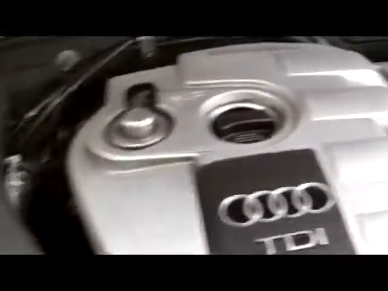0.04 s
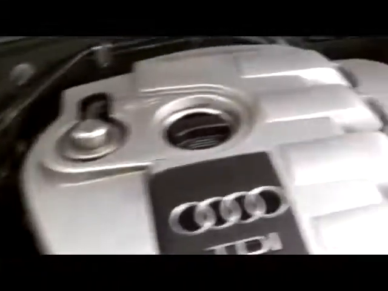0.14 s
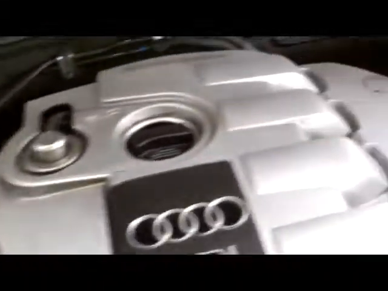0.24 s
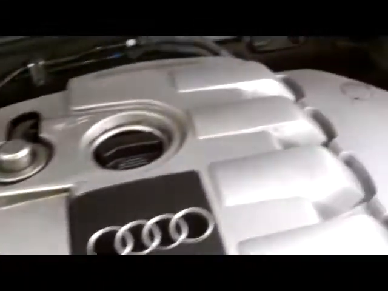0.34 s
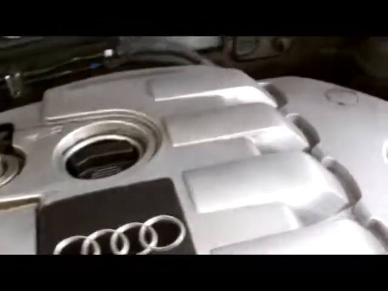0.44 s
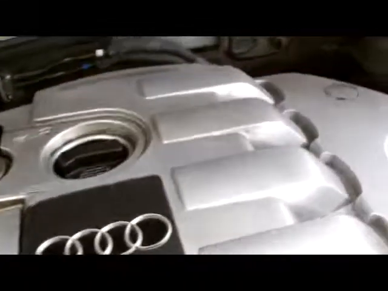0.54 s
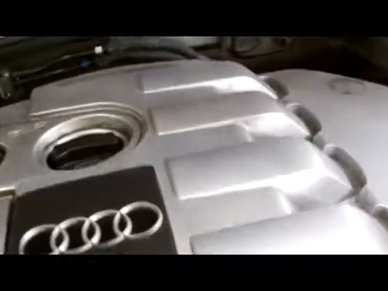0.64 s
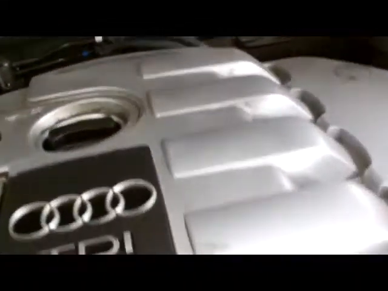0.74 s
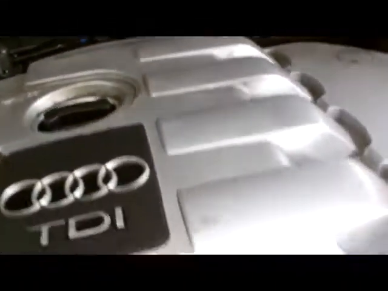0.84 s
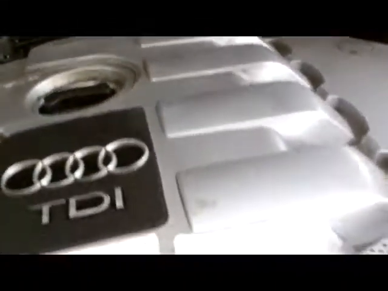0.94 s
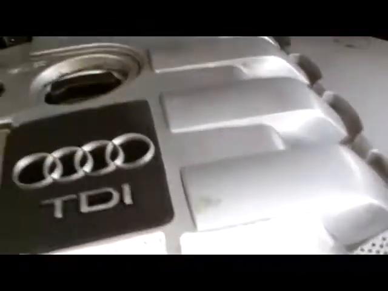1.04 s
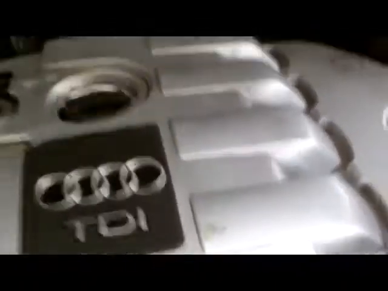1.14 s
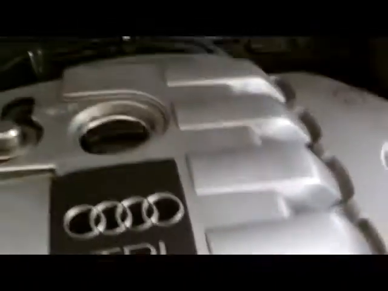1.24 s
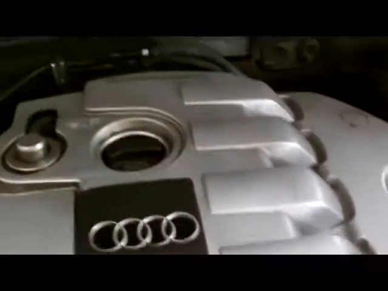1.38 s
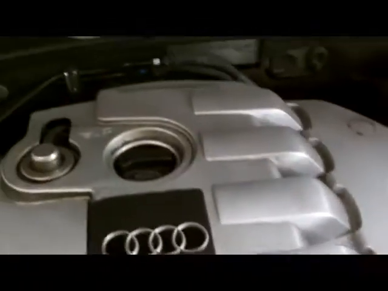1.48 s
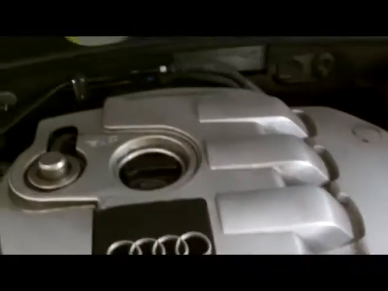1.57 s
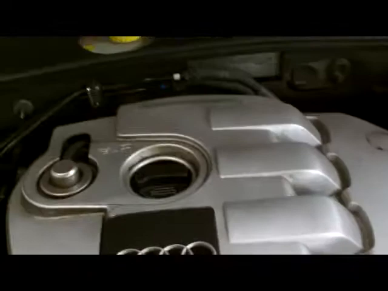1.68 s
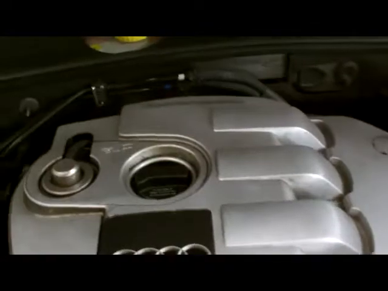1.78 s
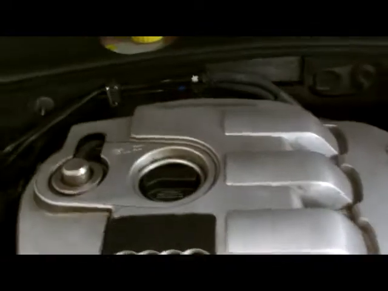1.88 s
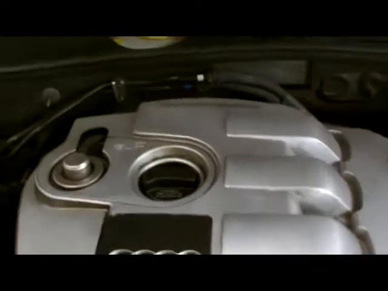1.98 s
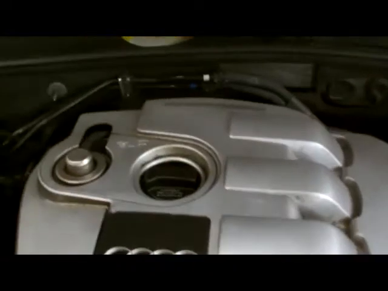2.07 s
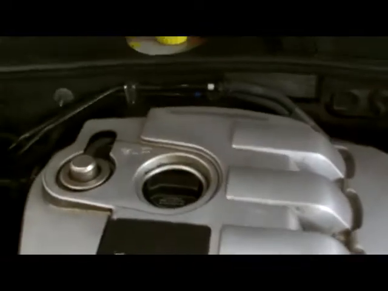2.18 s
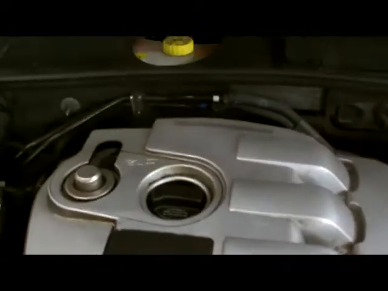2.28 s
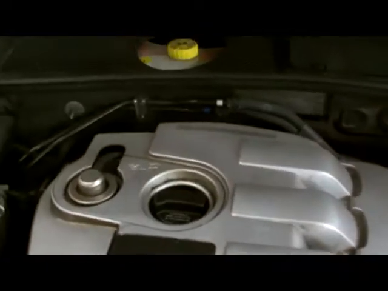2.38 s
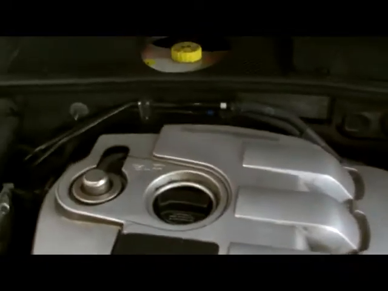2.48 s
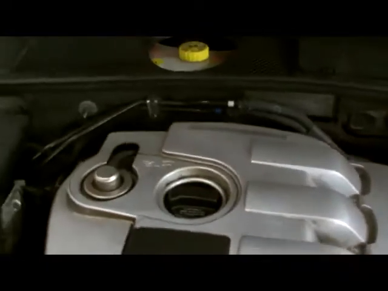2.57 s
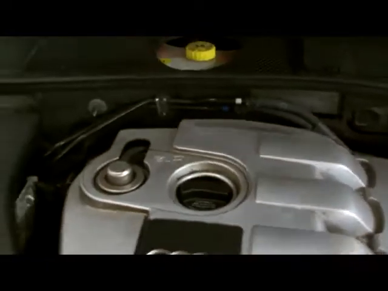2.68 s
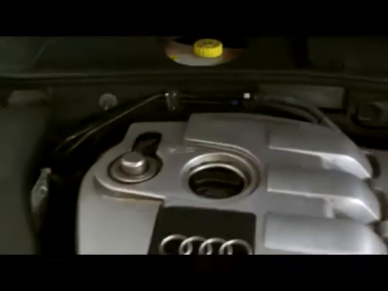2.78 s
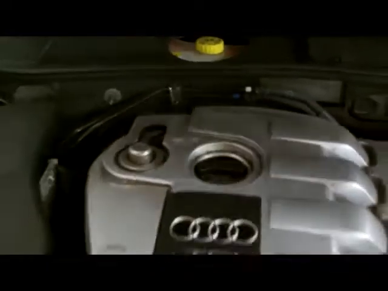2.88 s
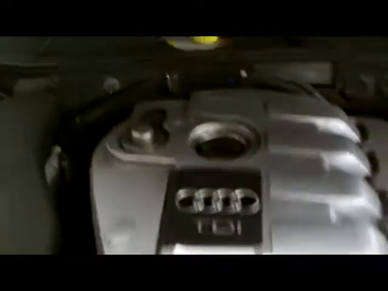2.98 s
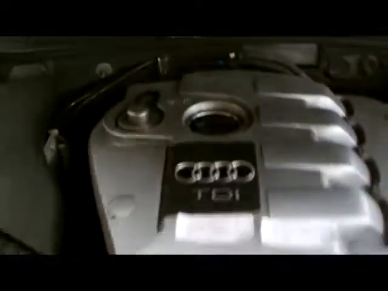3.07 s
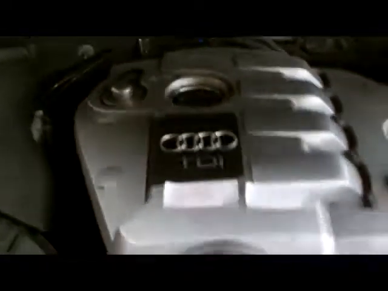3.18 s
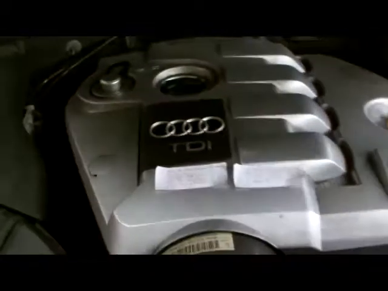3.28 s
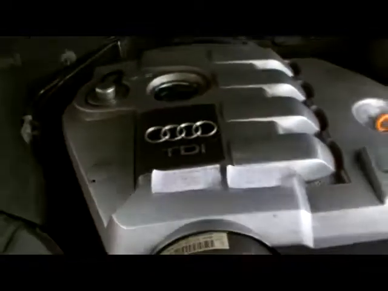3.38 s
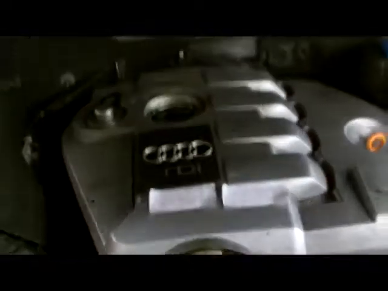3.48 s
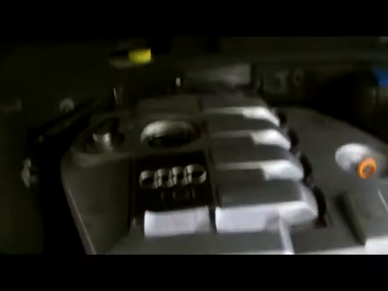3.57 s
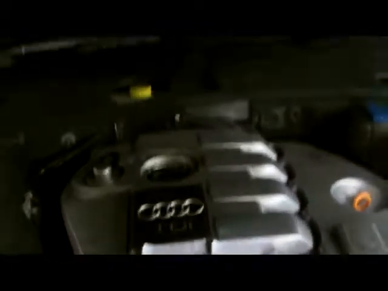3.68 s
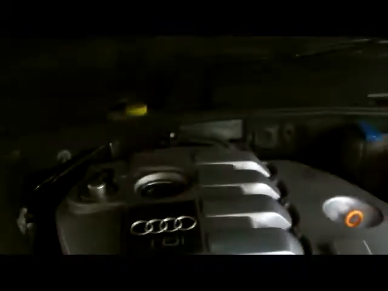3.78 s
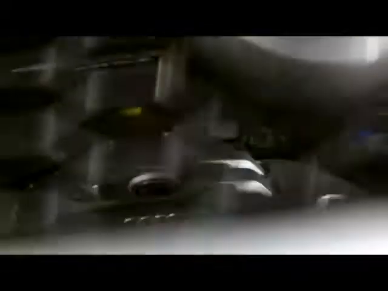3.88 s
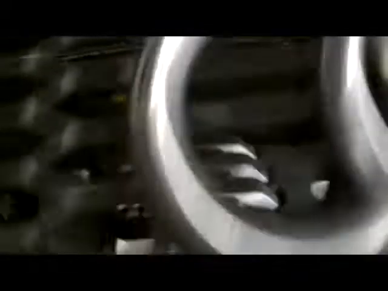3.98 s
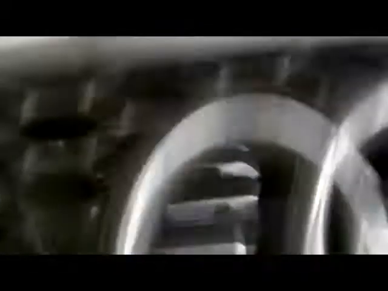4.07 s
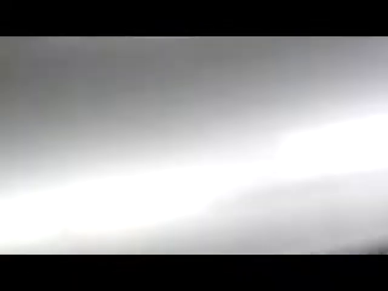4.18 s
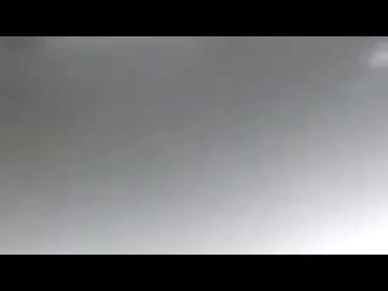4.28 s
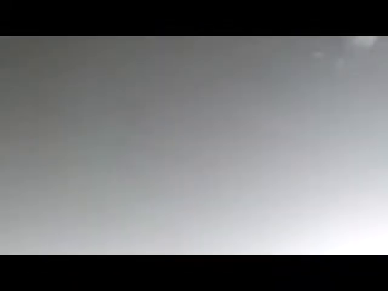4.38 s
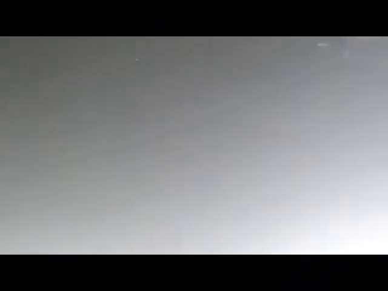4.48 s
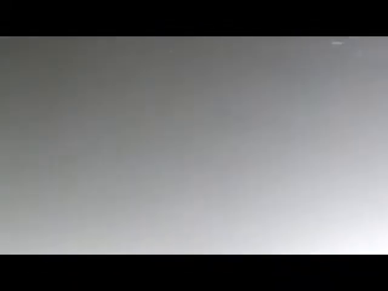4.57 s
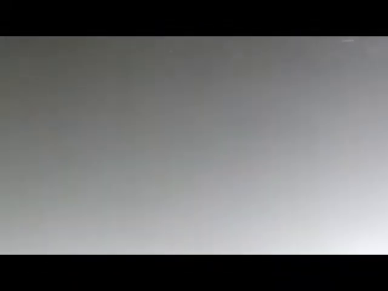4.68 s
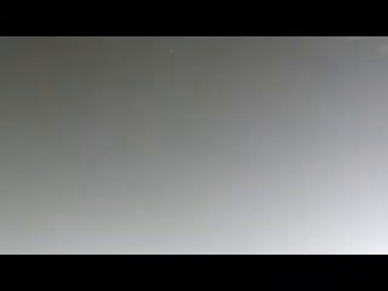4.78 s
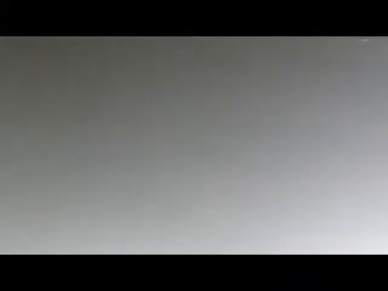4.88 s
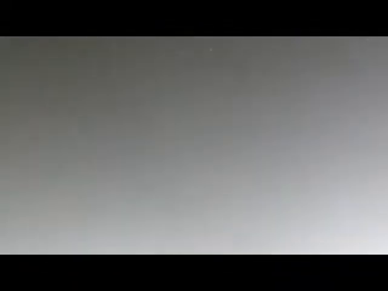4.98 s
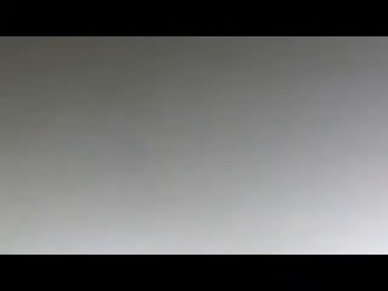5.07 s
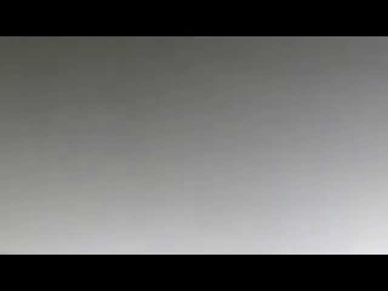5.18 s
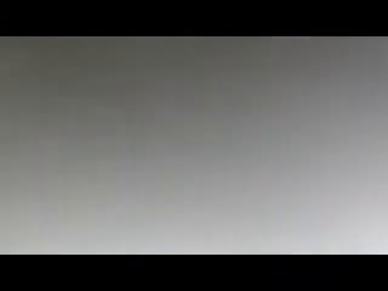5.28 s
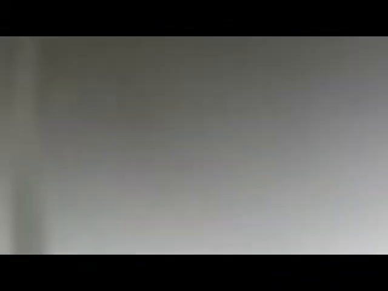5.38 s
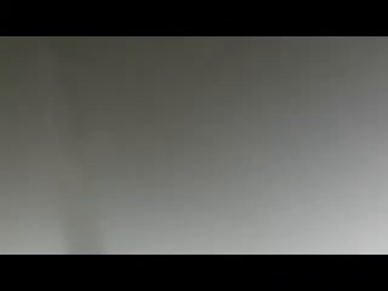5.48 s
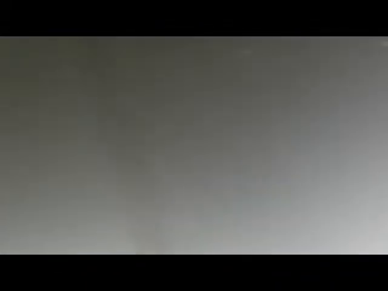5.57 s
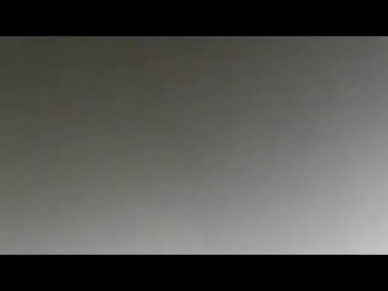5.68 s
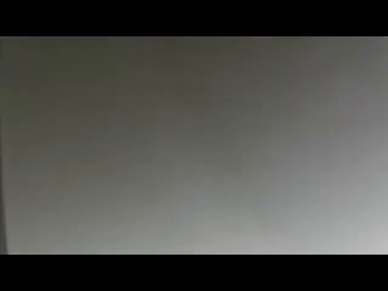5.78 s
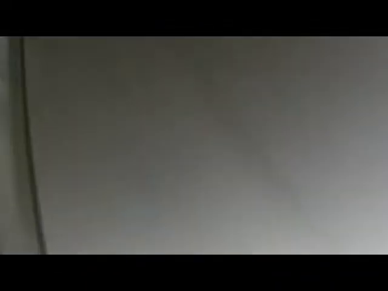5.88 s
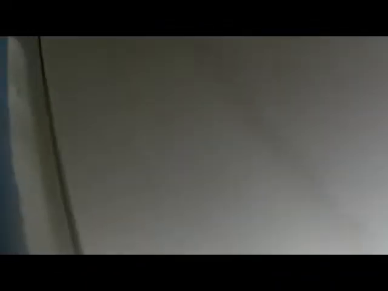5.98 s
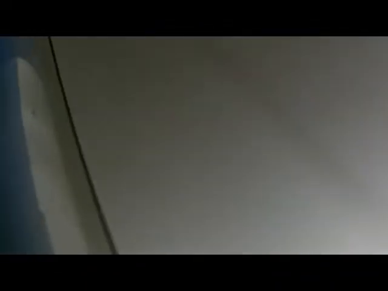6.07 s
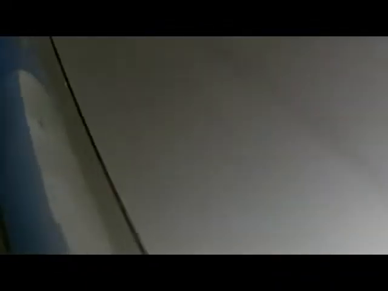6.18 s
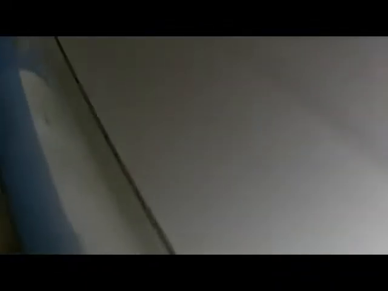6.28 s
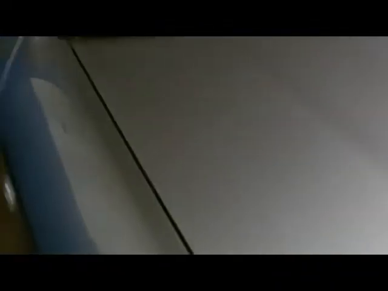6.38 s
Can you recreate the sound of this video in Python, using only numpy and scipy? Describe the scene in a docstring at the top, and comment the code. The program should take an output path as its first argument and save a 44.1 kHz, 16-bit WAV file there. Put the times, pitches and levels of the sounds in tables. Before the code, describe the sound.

Clothes rustle, metal clatters as a car bonnet is freed, hinge clicks and scrapes, then it slams shut in an echoing garage, followed by footsteps.

```python
"""A car bonnet is shut in a garage, heard from just in front of it.
Clothes rustle close by, with thin squeaks, and metal clatters as the bonnet is freed: noise and struck modes.
On the way down it bumps, clicks twice and scrapes (modes, pulses, gritty noise), and a sleeve sweeps along.
It slams into its catch as a burst of blows over ringing sheet metal, with a low rumble of swelling noise.
A few steps on the hard floor follow, one with a low boom; room air, hiss and the garage's echo run throughout."""
import sys
import numpy as np
from scipy import signal
from scipy.fft import rfft, irfft, next_fast_len
from scipy.io import wavfile

SR = 44100
rng = np.random.default_rng(int(sys.argv[2]) if len(sys.argv) > 2 else 0)


def bounce(signal):
    """Save signal as a 16-bit WAV file at the path given by the first command-line argument."""
    frames = np.transpose(np.atleast_2d(signal))
    limited = np.clip(frames, -1, 1)
    pcm = np.round(limited * 32767).astype(np.int16)
    wavfile.write(sys.argv[1], SR, pcm)


N = 284004
TIME = np.arange(N) / SR
# third-octave bands, edges and centres in Hz
EDGES = 22 * 2 ** (np.arange(30) / 3)
CENTRES = np.sqrt(EDGES[1:] * EDGES[:-1])
BANK = [signal.butter(2, pair, "band", fs=SR, output="sos") for pair in zip(EDGES, EDGES[1:])]

# Contacts: t/s, energy level/dB before the mix, base ring t60/s, tilt/(dB per octave)
# bonnet coming free
CLATTER = [(0.960, -13, 0.081, -3.5), (1.0975, 7.5, 0.025, -3.5), (1.1025, 5, 0.021, -2),
           (1.117, -1.5, 0.22, -5), (1.1505, 4, 0.023, -0.5), (1.275, -10, 0.18, -2),
           (1.423, -29.5, 0.044, 4), (1.600, -21, 0.087, -4.5), (1.645, -24.5, 0.022, -6.5)]
# bonnet hitting catch and stops
SLAM = [(4.3857, 11.5, 0.021, -2), (4.3868, 11, 0.0069, 3), (4.3915, -1, 0.034, -5),
        (4.3975, 8.5, 0.038, -0.5), (4.409, 5.5, 0.03, -3), (4.4172, 4.5, .04, -1.3)]
# hinge clicks
CLICKS = [(2.839, -26, 0.11, -7.5), (2.9434, -8, 0.025, -2), (2.9463, -8.5, 0.068, 11),
          (3.0971, -3.5, 0.0072, 1.5), (3.1, -5, 0.1, 3.5)]
# shoes on the floor
STEPS = [(5.4256, -9, 0.034, -4), (5.470, -21, 0.05, -2), (5.846, -26, 0.018, 6.5),
         (6.1168, -13, 0.029, -2), (6.408, -28, 0.036, 26)]
# soft bumps of the whole panel
BUMPS = [(0.961, -28, 0.14, -30), (1.150, -3.5, 0.089, 6), (1.276, -14.5, 0.13, 3), (1.424, -20.5, 0.23, 3),
         (1.645, -28.5, 0.36, 6.5), (2.172, -26, 1, 3.5), (2.534, -13.5, 0.16, 3),
         (2.578, -25.5, 0.08, -26)]

# Colours, the relative spectra of the sources: f/Hz, level/dB per Hz
# metal clatter
CLATTER_COLOUR = [(35, -51), (110, -25.5), (240, -22), (340, -23), (480, -14.5), (680, -13.5), (900, -5.5),
                  (1200, -4), (1800, -2.5), (2500, -7.5), (4600, -6), (8100, 2.5), (9500, -6.5),
                  (12800, -12), (15500, -28.5)]
# slam
SLAM_COLOUR = [(18, -36), (30, -28.5), (97, -41), (177, -23.5), (300, -21), (450, -8.5), (691, -6.5),
               (900, -11.5), (1150, -6.5), (1900, -12.5), (2500, -6.5), (3490, -12), (4190, -9.5),
               (7500, -4), (14000, -20.5), (15500, -31)]
# hinge clicks
CLICK_COLOUR = [(40, -53), (120, -17), (300, -20), (600, -10.5), (950, -21), (1180, 0.5), (1500, 0),
                (2750, 5), (3900, -1), (7000, 3.5), (9500, -2), (13400, -10), (15500, -31)]
# steps
STEP_COLOUR = [(30, -33), (150, -27.5), (300, -11.5), (580, 4), (900, 2.5), (1400, 1.5), (2300, -9),
               (3200, -14), (7000, -22.5), (15000, -57)]
# panel bumps
BUMP_COLOUR = [(45, -38), (75, -14), (115, -0.5), (250, 3), (560, 6.5), (780, -16.5), (1500, -20),
               (4000, -29), (14000, -35)]
# sliding hinge and its grit
SCRAPE_COLOUR = [(88, -43), (150, -27.5), (509, -18.5), (607, -16.5), (812, -10.5), (894, -15),
                 (1540, -9.5), (1700, -9), (3910, -10.5), (8170, -8), (15500, -25.5)]
# hissing cloth
CLOTH_COLOUR = [(100, -44), (900, -11.5), (2000, -4), (4000, -1.5), (7500, 1), (9500, -2.5), (12500, -7),
                (15500, -18.5)]
# dull shuffle under the cloth
SHUFFLE_COLOUR = [(60, -49), (200, -2), (500, 8), (1000, 7), (1800, 4.5), (4000, -50.5)]
# sweeping sleeve
SWISH_COLOUR = [(180, -39.5), (300, -14.5), (674, -8.5), (985, -20), (1220, -9.5), (1940, -14.5),
                (2320, -10.5), (8280, -2), (12100, -1.5), (15500, -15)]
# room air and port hiss
AIR_COLOUR = [(55, -43), (110, -15), (200, -12.5), (330, -8), (800, -6), (1500, -10.5), (6500, -14),
              (7900, -10), (15500, -21)]
# low rumble and boom
RUMBLE_COLOUR = [(20, 1.5), (50, -5), (90, -4), (190, 5.5), (300, -11), (1000, -50)]

# Modes, levels relative to the blow's ringing level
# sheet metal of the bonnet: f/Hz, level/dB, t60/s
PANEL_MODES = [(165.5, -30, 0.21), (200.5, -25, 0.2), (456, -15.5, 0.11), (520, -14, 0.18), (693, -7, 0.1),
               (945, -36, 0.63), (1153, -13, 0.14), (1193, -33.5, 0.44), (1574, -31.5, 0.62),
               (1850, -37.5, 1), (2450, -23.5, 0.12), (4910, -28.5, .2), (5560, -25, .2),
               (5810, -23.5, 0.18)]
# metal stay and its bracket: f/Hz, level/dB, t60/s
STAY_MODES = [(900, -5, 0.058), (984, -30, 0.22), (1145, -29.5, 0.43), (1657, -29, 0.27),
              (1745, -10.5, 0.038), (4220, -30, 0.1), (6270, -15, 0.1)]
# steel catch, whose ring is brief: f/Hz, level/dB, t60/s
CATCH_MODES = [(4040, -13, 0.13), (6800, -15, 0.15), (7055, -19.5, .09), (7500, -1.5, 0.017)]
# flexing of the open bonnet: f/Hz, energy level/dB, t60/s
FLEX_MODES = [(118, 0.5, 0.13), (236, 1.5, .16), (284, -3, 0.28), (530, 0.5, .12)]
# hinge: f/Hz, energy level/dB, t60/s
HINGE_MODES = [(1210, 2.5, 0.035), (1926, -3, 0.031), (2770, 1.5, 0.071), (6720, 7, 0.017)]

# low rumble after the slam, and the low boom of a footstep: peak t/s, level/dB, rise/s, fall/s
RUMBLES = [(4.45, -64.5, .04, 0.4), (5.57, -63, 0.12, 0.12)]
# moves of arms and body: peak t/s, cloth hiss level/dB, rise/s, fall/s, low shuffle level/dB
MOVES = [(0.05, -57, 0.071, 0.077, -56.5), (0.15, -54.5, 0.11, 0.13, -57), (0.43, -55.5, 0.1, 0.2, -67),
         (0.57, -59.5, 0.2, 0.75, -66), (1.67, -50, 0.2, 0.11, -62.5), (1.93, -55, 0.035, 0.056, -63),
         (2.088, -50.5, 0.042, 0.045, -66), (2.16, -45, 0.065, 0.052, -67), (2.222, -51, 0.057, 0.094, -64),
         (2.74, -59, 0.017, 0.011, -91.5), (2.859, -53, 0.048, 0.28, -74.5),
         (5.47, -54.5, 0.18, 0.14, -62.5), (5.857, -58, 0.0098, 0.097, -57), (6.17, -54, 0.34, 0.56, -65.5)]
# thin, faint squeaks: peak t/s, level/dB, rise/s, fall/s, f/Hz at the peak, waver/Hz
SQUEAKS = [(.14, -58, .5, .12, 8070, 20), (.36, -66, .15, .07, 12050, 130), (.68, -67, .2, .1, 8160, 30),
           (.72, -65, .06, .11, 12050, 130)]
# loose parts knocking as the hinge slides: t/s, level/dB before the bass cut, f/Hz, t60/s
RATTLES = [(3.246, -35.5, 820, 0.03), (3.261, -43, 2370, 0.022), (3.289, -39, 1690, 0.081),
           (3.299, -37, 1900, 0.017), (3.351, -41, 3384, 0.12), (3.385, -42, 1210, 0.01),
           (3.402, -30, 1140, .018)]

# decay of the garage: f/Hz, t60/s
GARAGE_T60 = [(60, 1.7), (200, 0.77), (500, 0.6), (1200, 0.94), (2500, 0.95), (5000, 0.84), (8000, 0.5),
              (15000, 0.5)]
# strength of its echo: f/Hz, level/dB
GARAGE_GAIN = [(60, -6), (200, 2), (600, -1), (1500, -2.5), (4000, -3), (8000, -4), (15000, -2)]
# microphone ports, left minus right before scattering: f/Hz, level/dB
PORT_BALANCE = [(60, .5), (5500, .1), (6800, 4.5), (8100, 11.5), (9500, 0), (11500, -7), (15000, -2.5)]
# phase by which left lags, before scattering: f/Hz, lag/rad
PORT_LAG = [(400, 0.05), (1500, 0.24), (3000, 0.067), (6500, 0.29), (7600, 0.89), (8700, 1.46),
            (10500, 1.1), (15000, 0.19)]
# scattering by the case of sound from ahead, opposite at the two ports: f/Hz, level/dB
DIRECT_SCATTER = [(100, -15.5), (600, -24), (4000, -23), (7000, -10), (12000, -4)]
# the same for sound from around: f/Hz, level/dB
DIFFUSE_SCATTER = [(1000, -37), (4000, -47.5), (7000, -4), (12000, -2.5)]

AIR_DB, HISS_DB = -65, -71  # room air, shared; hiss of each port
SWELL_DB = 10  # rise and fall are the times a swell takes to change by this much
SQUEAK_GLIDE_HZ_PER_S = 250
SCATTER_T60_S = .05
CRISP_T60_S = 0.015  # longer contacts are a graze and lose some of their snap
CUTOFF_HZ = 15500
# the hinge slides, easing as it goes
SCRAPE_FROM_S, SCRAPE_TO_S, SCRAPE_ATTACK_S, SCRAPE_T60_S = 3.238, 3.395, 0.027, 0.37
SCRAPE_DB, SCRAPE_DB_PER_S = -37, -32.5
# a sleeve sweeps down with the bonnet, gathering speed
SWISH_FROM_S, SWISH_TO_S, SWISH_ATTACK_S, SWISH_T60_S = 4.069, 4.31, 0.053, 0.1
SWISH_DB, SWISH_DB_PER_S = -52.5, 33
# grit in the hinge; the tilt is per octave
GRIT_DB, GRIT_SPREAD_DB, GRIT_T60_S, GRIT_TILT_DB = -22.5, -1, 0.016, 1


def amp(db):
    """Decibels to gain."""
    return 10 ** (np.asarray(db) / 20)


def unit(x):
    """Scale to an energy of one."""
    return x / np.sqrt(np.sum(x ** 2) + 1e-20)


def at_hz(points, hz):
    """Read a table on a log-frequency axis."""
    f, value = np.transpose(points)
    return np.interp(np.log(np.maximum(hz, 1)), np.log(f), value)


def tilted(colour, tilt_db, hz):
    """Gain of a spectrum; a harder or softer contact tilts everything above the bass."""
    return amp(at_hz(colour, hz) + tilt_db * np.log2(np.maximum(hz, 300)))


def fading(t, t60):
    """Envelope that loses 60 dB in t60."""
    return np.exp(-np.log(1000) * t / t60)


def swell(s, db, rise_s, fall_s):
    """Gain that grows steadily in dB up to a peak, then dies away."""
    away = np.maximum((s - TIME) / rise_s, (TIME - s) / fall_s)
    return amp(db) * np.exp(np.log(amp(-SWELL_DB)) * np.minimum(away, 20))


def stroke(from_s, to_s, db, db_per_s, attack_s, t60):
    """Gain of a sliding stroke: attack, a sloping hold, release."""
    held = np.clip(TIME, from_s, to_s) - from_s
    attack = np.minimum(held / attack_s, 1)
    release = fading(np.maximum(TIME - to_s, 0), t60)
    return attack * amp(db + db_per_s * held) * release


def wander(rate_hz):
    """Random curve with a new normal value at each knot, joined by straight lines."""
    knots = TIME[::SR // rate_hz]
    return np.interp(TIME, knots, rng.standard_normal(len(knots)))


def add(track, s, sound):
    """Mix a sound in at a time."""
    start = round(s * SR)
    track[start:start + len(sound)] += sound[:N - start]


def friction(colour, grain_db):
    """Noise of rms one, made of countless tiny slips that come in clumps."""
    slips = rng.standard_normal(N) * amp(grain_db * wander(400))
    size = next_fast_len(N)
    gain = amp(at_hz(colour, np.fft.rfftfreq(size, 1 / SR)))
    shaped = irfft(rfft(slips, size) * gain, size)[:N]
    return unit(shaped) * np.sqrt(N)


def band_noises(size):
    """Noise of rms one in every third octave; neighbouring bands are unrelated."""
    white = rng.standard_normal((3, size + SR // 2))  # the extra half second lets the filters settle
    bands = [signal.sosfilt(sos, white[k % 3])[-size:] for k, sos in enumerate(BANK)]
    return [unit(band) * np.sqrt(size) for band in bands]


def mode(hz, t60):
    """A struck resonance: it gets going within a cycle, then dies away."""
    t = TIME[:SR]
    return np.cos(2 * np.pi * hz * t) * (1 - np.exp(-2 * hz * t)) * fading(t, t60)


def pulse(colour, tilt_db):
    """The most compact causal pulse that has this spectrum (minimum phase)."""
    hz = np.fft.rfftfreq(4096, 1 / SR)
    cepstrum = irfft(np.log(tilted(colour, tilt_db, hz)))
    # fold the cepstrum onto positive time
    cepstrum[1:len(hz) - 1] *= 2
    cepstrum[len(hz):] = 0
    return unit(irfft(np.exp(rfft(cepstrum))))


def blows(rows, colour, noises, snap, hang_cycles):
    """Each contact is one sharp pulse and a dense ring of modes, in which the lows last longer."""
    track, t = np.zeros(N), TIME[:SR // 5]
    rises = 1 - np.exp(-2 * np.outer(CENTRES, t))  # a mode needs about a cycle to get going
    for s, db, t60, tilt_db in rows:
        start, ring = rng.integers(len(noises[0]) - len(t)), 0
        gains = unit(tilted(colour, tilt_db, CENTRES) * np.sqrt(np.diff(EDGES)))
        for hz, gain, noise, rise in zip(CENTRES, gains, noises, rises):
            band = noise[start:start + len(t)] * rise * fading(t, t60 + hang_cycles / hz)
            ring = ring + gain * unit(band)
        crisp = snap * min(1, CRISP_T60_S / t60)
        size = amp(db) / np.hypot(1, crisp)  # ring and pulse share the energy
        add(track, s, size * ring)
        add(track, s, -size * crisp * pulse(colour, tilt_db))
    return track


def ringing(rows, modes, level_db):
    """The hardest blow of a group sets the metal ringing."""
    track = np.zeros(N)
    hardest_s = max(rows, key=lambda row: row[1])[0]
    # neighbouring modes start with opposite signs
    ring = sum((-1) ** k * amp(db) * mode(hz, t60) for k, (hz, db, t60) in enumerate(modes))
    add(track, hardest_s, amp(level_db) * ring)
    return track


def rung(rows, modes, level_db):
    """Every contact rings the same modes, and its tilt shifts the balance between low and high ones."""
    track = np.zeros(N)
    for s, db, _, tilt_db in rows:
        ring = sum(amp(share_db + tilt_db * np.log2(hz)) * unit(mode(hz, t60))
                   for hz, share_db, t60 in modes)
        add(track, s, amp(db + level_db) * unit(ring))
    return track


def bass_cut(x, corner_hz):
    """Cut away the bass below a corner."""
    high_pass = signal.butter(2, corner_hz, "high", fs=SR, output="sos")
    return signal.sosfilt(high_pass, x + 1e-18)


def port_hiss():
    """Each port adds steady noise of its own."""
    return amp(HISS_DB) * np.array([friction(AIR_COLOUR, grain_db=1.5) for port in ("left", "right")])


def room_air():
    """A steady bed of soft noise fills the room."""
    return amp(AIR_DB) * friction(AIR_COLOUR, grain_db=1.0)


def garage(x, build_s):
    """In each band the sound's energy spreads into a diffuse field that the walls slowly soak up."""
    out, build = 0, np.exp(-1 / (build_s * SR))
    x = x + 1e-9 * rng.standard_normal(N)
    for hz, sos, noise in zip(CENTRES, BANK, band_noises(N)):
        keep = fading(1 / SR, at_hz(GARAGE_T60, hz)) ** 2  # energy left after one sample
        feed, feedback = [(1 - build) * (1 - keep)], [1, -build - keep, build * keep]
        energy = signal.lfilter(feed, feedback, signal.sosfilt(sos, x) ** 2)
        out = out + amp(at_hz(GARAGE_GAIN, hz)) * np.sqrt(np.abs(energy)) * noise
    return out


def low_rumble():
    """A rumble after the slam and the boom of a footstep: low noise swells and dies away."""
    return sum(swell(*row) for row in RUMBLES) * friction(RUMBLE_COLOUR, grain_db=1.0)


def squeaks():
    """Narrow, wavering tones that creep up in pitch."""
    out = 0
    for s, db, rise, fall, hz, waver_hz in SQUEAKS:
        pitch = hz + SQUEAK_GLIDE_HZ_PER_S * (TIME - s) + waver_hz * wander(200)
        out = out + swell(s, db, rise, fall) * np.sin(2 * np.pi * np.cumsum(pitch) / SR)
    return out


def clothes():
    """Cloth hisses with each move, over a duller shuffle; a sleeve sweeps down before the slam."""
    hiss = np.sqrt(sum(swell(s, db, rise, fall) ** 2 for s, db, rise, fall, _ in MOVES))
    shuffle = np.sqrt(sum(swell(s, db, rise, fall) ** 2 for s, _, rise, fall, db in MOVES))
    sweep = stroke(SWISH_FROM_S, SWISH_TO_S, SWISH_DB, SWISH_DB_PER_S, SWISH_ATTACK_S, SWISH_T60_S)
    return (hiss * friction(CLOTH_COLOUR, grain_db=1.36)
            + shuffle * friction(SHUFFLE_COLOUR, grain_db=2.5)
            + sweep * friction(SWISH_COLOUR, grain_db=1.3))


def footsteps(noises):
    """Shoes strike the hard floor: snappy blows whose lows hang on."""
    return blows(STEPS, STEP_COLOUR, noises, snap=1.44, hang_cycles=12.0)


def grit(count):
    """Uneven little contacts at random moments while the hinge slides."""
    length_s = SCRAPE_TO_S - SCRAPE_FROM_S
    return [(SCRAPE_FROM_S + when * length_s, GRIT_DB + GRIT_SPREAD_DB * (2 * size - 1),
             GRIT_T60_S, GRIT_TILT_DB)
            for when, size in rng.random((count, 2))]


def rattles():
    """Each loose part gives one damped mode."""
    track = np.zeros(N)
    for s, db, hz, t60 in RATTLES:
        add(track, s, amp(db) * mode(hz, t60))
    return track


def hinge_scrape(noises):
    """The sliding hinge rubs as clumpy noise, crunches on grit and knocks loose parts."""
    slide = stroke(SCRAPE_FROM_S, SCRAPE_TO_S, SCRAPE_DB, SCRAPE_DB_PER_S, SCRAPE_ATTACK_S, SCRAPE_T60_S)
    rub = slide * friction(SCRAPE_COLOUR, grain_db=2.0)
    crunch = blows(grit(count=12), SCRAPE_COLOUR, noises, snap=0.38, hang_cycles=5.1)
    return rub + crunch + bass_cut(rattles(), corner_hz=300)


def hinge_clicks(noises):
    """Sharp contacts ring the hinge; their bass is cut away."""
    contacts = blows(CLICKS, CLICK_COLOUR, noises, snap=0.78, hang_cycles=4.6)
    return bass_cut(contacts + rung(CLICKS, HINGE_MODES, level_db=-6.0), corner_hz=510)


def panel_bumps(noises):
    """Each bump of the open bonnet makes the whole panel flex at its low modes."""
    contacts = amp(-3) * blows(BUMPS, BUMP_COLOUR, noises, snap=3.3, hang_cycles=4.6)
    return contacts + rung(BUMPS, FLEX_MODES, level_db=-4.0)


def metal_clatter(noises):
    """The freed bonnet clatters, and the hardest blow rings the stay and its bracket."""
    contacts = blows(CLATTER, CLATTER_COLOUR, noises, snap=0.53, hang_cycles=3.9)
    return contacts + ringing(CLATTER, STAY_MODES, level_db=-11.5)


def bonnet_slam(noises):
    """Blows on catch and stops crowd together, and the hardest rings the sheet metal and the catch."""
    contacts = blows(SLAM, SLAM_COLOUR, noises, snap=0.2, hang_cycles=10.0)
    return contacts + ringing(SLAM, PANEL_MODES + CATCH_MODES, level_db=-8.5)


def ports(x, scattering):
    """Two close ports hear nearly the same up to the treble, where each resonates and the case scatters."""
    size, t = next_fast_len(N + SR // 10), TIME[:SR // 10]
    hz, spectrum = np.fft.rfftfreq(size, 1 / SR), rfft(x, size)
    # each port takes half of the difference in level and phase
    half = amp(at_hz(PORT_BALANCE, hz) / 2) * np.exp(-.5j * at_hz(PORT_LAG, hz))
    tail = unit(rng.standard_normal(len(t)) * fading(t, SCATTER_T60_S))
    scatter = amp(at_hz(scattering, hz)) * rfft(tail, size)
    return irfft(spectrum * np.array([half + scatter, 1 / half - scatter]), size)[:, :N]


def scene():
    """Sources arrive from ahead or around, and the contacts also feed the garage, each by its own share."""
    noises = band_noises(2 * SR)
    steps = footsteps(noises)
    scrape = hinge_scrape(noises)
    clicks = hinge_clicks(noises)
    bumps = panel_bumps(noises)
    clatter = metal_clatter(noises)
    slam = bonnet_slam(noises)
    sent = (amp(-4.5) * steps + amp(-9.0) * scrape + amp(-1.5) * clicks
            + amp(-8.0) * bumps + amp(-2.5) * clatter + amp(-8.0) * slam)
    around = room_air() + garage(sent, build_s=0.0017) + squeaks() + clothes() + steps
    ahead = low_rumble() + scrape + clicks + bumps + clatter + slam
    return port_hiss() + ports(around, DIFFUSE_SCATTER) + ports(ahead, DIRECT_SCATTER)


def record(dry):
    """Peaks beyond full scale, as in the slam, are clipped; then the top is cut."""
    low_pass = signal.ellip(10, .2, 80, CUTOFF_HZ, fs=SR, output="sos")
    return signal.sosfilt(low_pass, np.clip(dry, -1, 1))


dry = scene()
out = record(dry)
bounce(out)
```